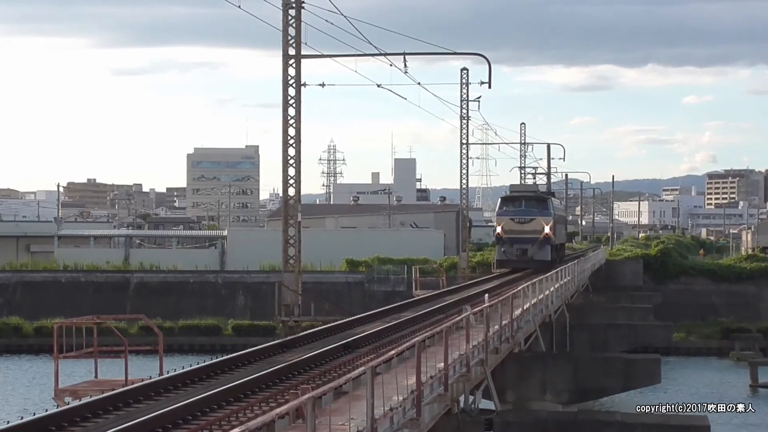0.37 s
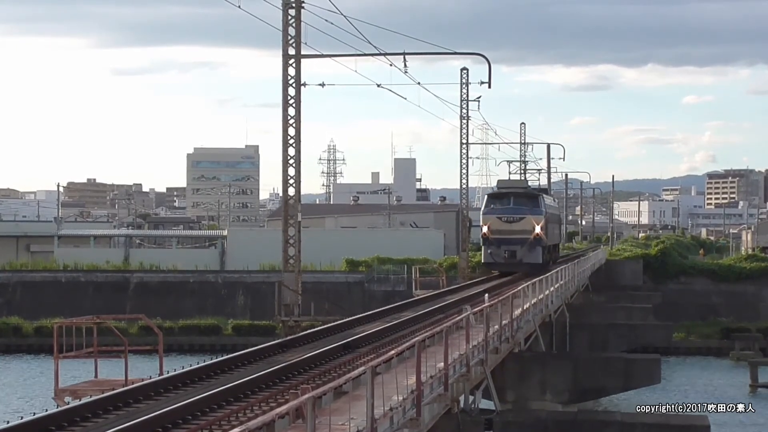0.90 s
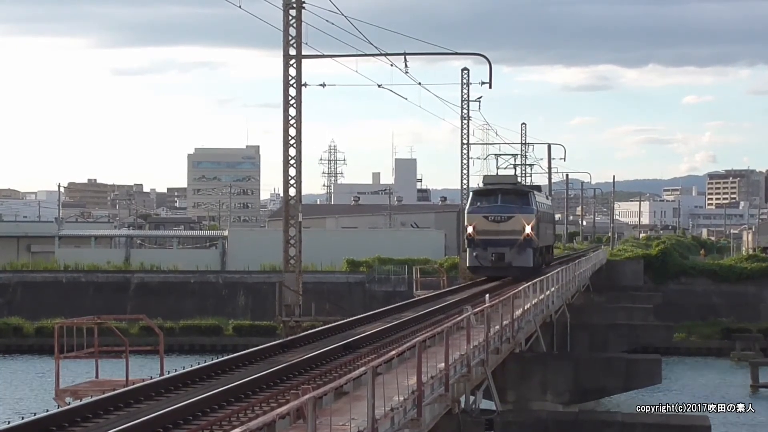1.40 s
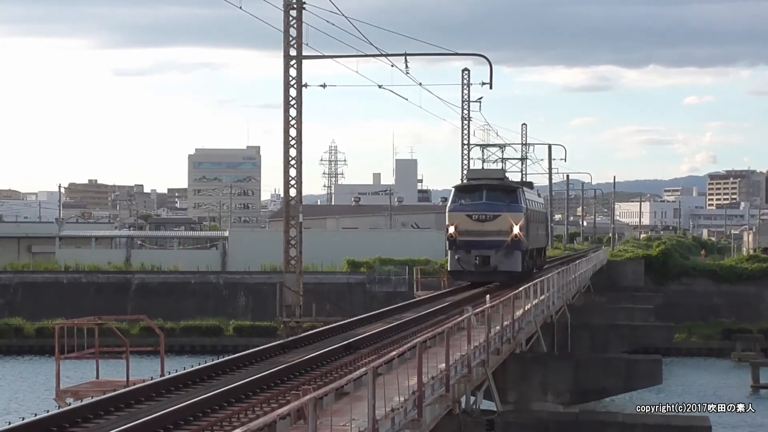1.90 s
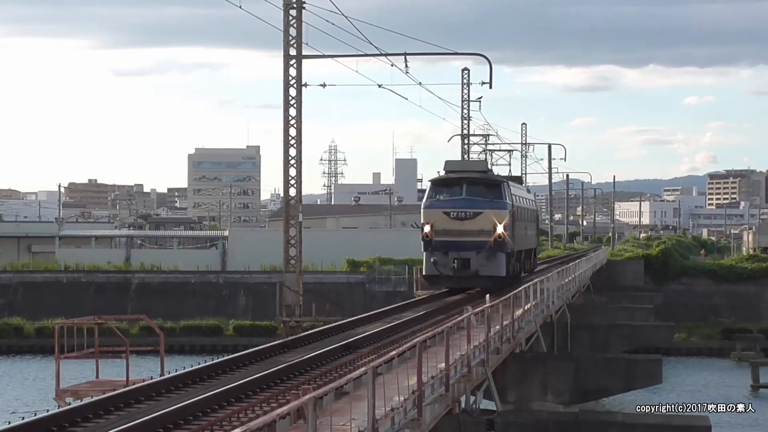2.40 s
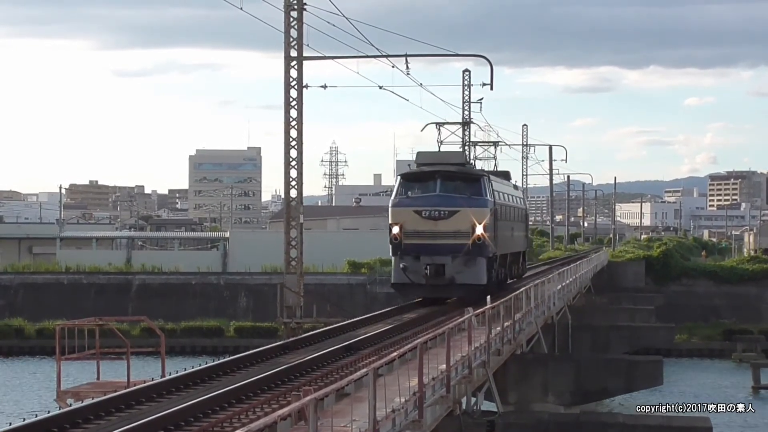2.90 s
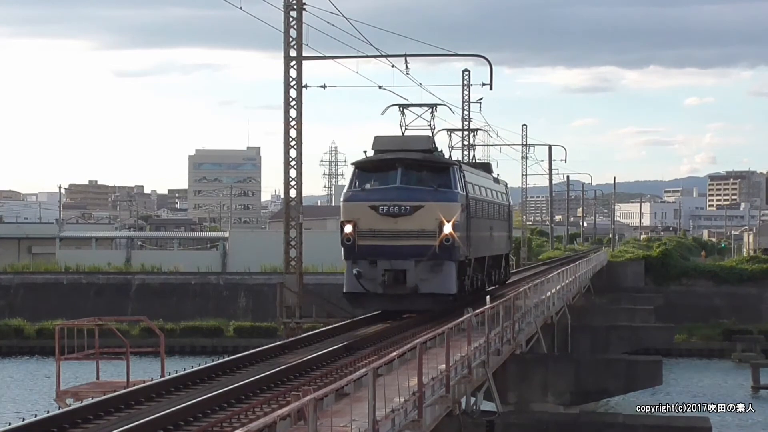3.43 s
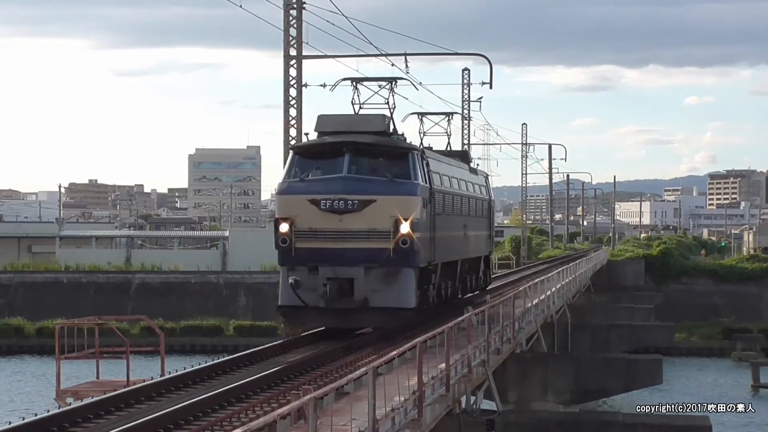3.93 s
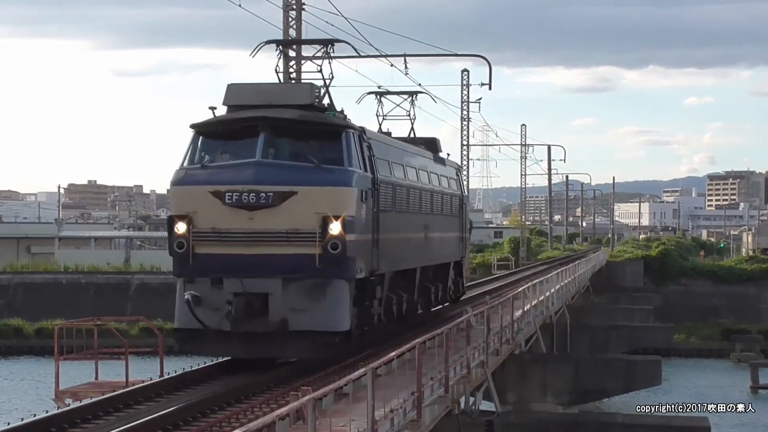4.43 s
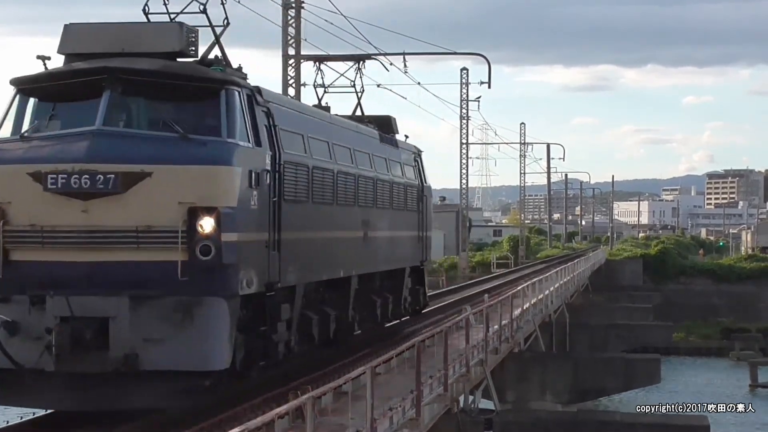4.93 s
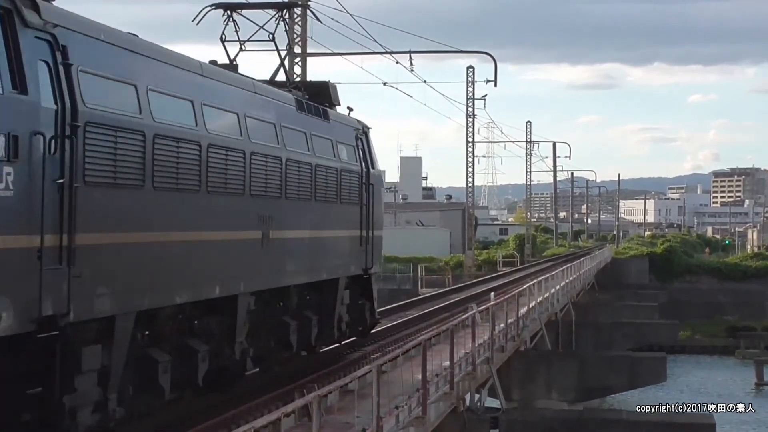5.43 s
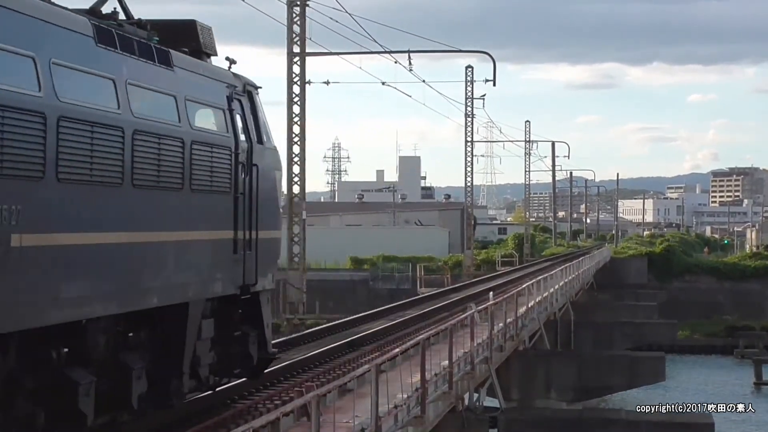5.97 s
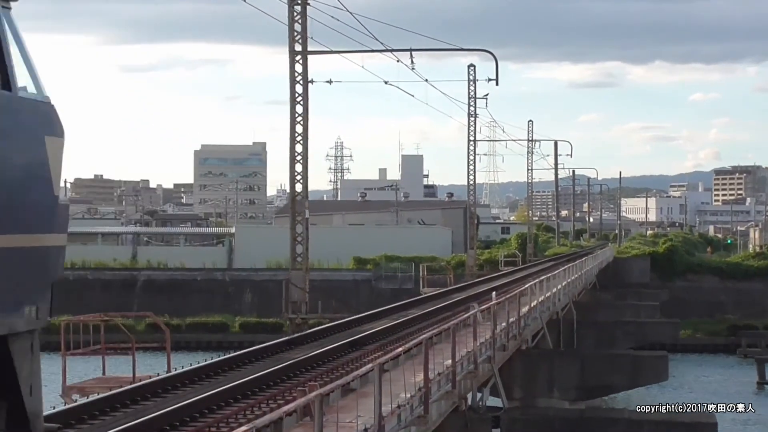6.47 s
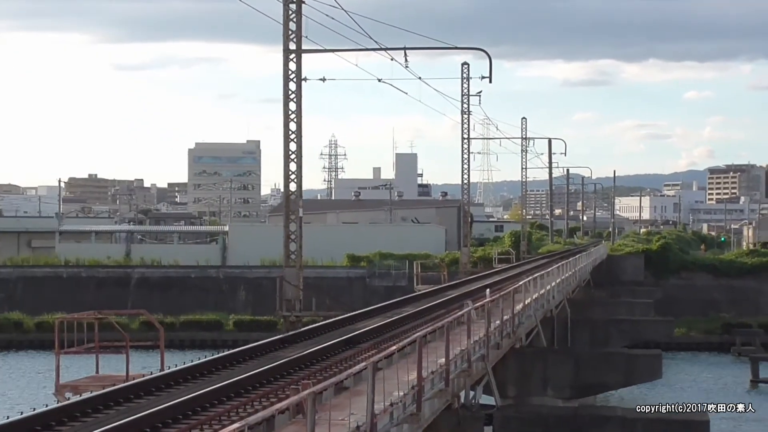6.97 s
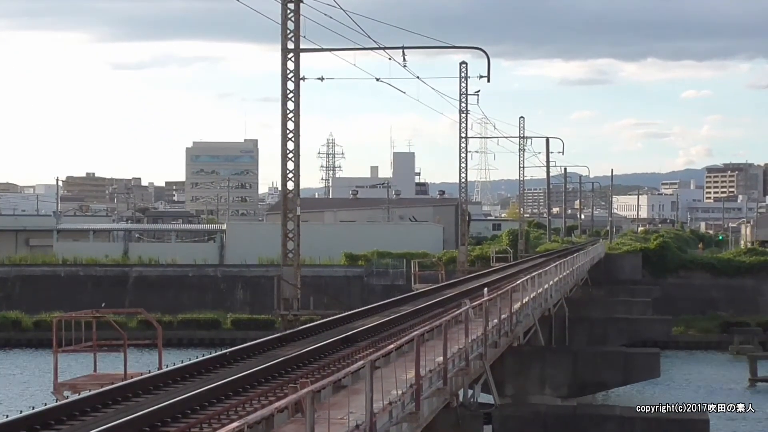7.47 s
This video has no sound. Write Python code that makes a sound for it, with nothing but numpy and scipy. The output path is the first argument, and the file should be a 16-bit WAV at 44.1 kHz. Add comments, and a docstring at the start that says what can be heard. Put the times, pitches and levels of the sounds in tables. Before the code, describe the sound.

An electric locomotive roars over a steel bridge, wheels knocking hard at rail joints, air hissing and a camera snapping as it passes and leaves left.

```python
"""A booming deck and roaring girders sound throughout, girders loudest near 6 s, with knocks at the rail
joints and buffeting wind: an electric locomotive crosses a steel bridge and leaves to the left.
Rolling, air and rattle are shaped noise bands; knocks are struck modes with broad cracks at the far joints.
Passing hums and gear whine are blurred tones, wind is low noise, a still camera's burst is pairs of
bright snaps, and a leak whistles as narrow, high noise."""
import sys
import numpy as np
from scipy import signal
from scipy.io import wavfile

SR = 44100
rng = np.random.default_rng(int(sys.argv[2]) if len(sys.argv) > 2 else 0)


def volts_from_decibels(level):
    """Turn decibel levels (scalar or array-like) into linear amplitude factors."""
    exponent = np.asarray(level, float) / 20
    return 10 ** exponent


def output_pcm(signal):
    """Save a mono or channel-first signal as 16-bit PCM at the path in sys.argv[1].

    Samples are clipped to [-1, 1] before scaling.
    """
    pcm = np.clip(np.atleast_2d(signal).T, -1, 1) * 32767
    wavfile.write(sys.argv[1], SR, np.round(pcm).astype(np.int16))


N = 335160  # length in samples
STEP = 32  # samples between control points of the noise bands
TREBLE_HZ = 5500  # from here up the treble has its own share from the side
FLUTTER_HZ, BURST_FLUTTER_DB = 9.0, 1.5  # unsteadiness of escaping air

# rolling sound: t/s, deck boom level/dB, girder roar level/dB, rail roll level/dB, wheel hiss level/dB
ROLLING_LEVELS = [(0, -22.5, -24.5, -33, -47), (.6, -20, -21.5, -36.5, -53), (1.2, -22, -22, -33.5, -48.5),
                  (1.7, -18, -17.5, -30, -46), (2.1, -22, -19, -31, -45.5), (2.5, -17.5, -15.5, -30.5, -46),
                  (3.0, -20.5, -15.5, -28.5, -45), (3.4, -20.5, -15, -27, -43),
                  (3.7, -23, -16.5, -29.5, -44.5), (4.2, -26, -13.5, -30, -44),
                  (4.6, -20.5, -13, -27, -41.5), (5.0, -22, -14.5, -29, -40), (5.4, -28, -14, -27.5, -42),
                  (5.9, -31.5, -12, -24.5, -40), (6.3, -25.5, -12, -26, -37.5),
                  (6.9, -26.5, -16, -29.5, -42), (7.25, -26.5, -18, -33.5, -43),
                  (7.6, -35, -29, -36.5, -51)]
# spectral shapes of the four rolling parts: f/Hz, relative level per Hz/dB
DECK_SPECTRUM = [(24, -48), (40, -66), (67, -11.5), (118, -2), (221, 1.5), (240, 4), (260, -0.5),
                 (340, -25), (570, -120)]
GIRDER_SPECTRUM = [(120, -45.5), (200, -13), (258, -6), (302, -3.5), (399, -2.5), (613, -10), (744, -21.5),
                   (850, -23), (1100, -56), (1870, -120)]
RAIL_SPECTRUM = [(410, -51), (700, 2), (831, 3), (909, -12.5), (1040, -3), (1400, -6.5), (1850, -22),
                 (2120, -14.5), (2480, -25.5), (3200, -47), (4160, -70), (7040, -120)]
WHEEL_SPECTRUM = [(1650, -5.5), (2800, -3), (3030, -3), (3960, -3.5), (4500, -11), (4790, -5.5),
                  (5530, -11), (7500, -9.5), (9750, -15.5), (16500, -120)]
# where the engine is: t/s, left over right level/dB, share from the side below the treble/0-1
BEARING = [(0.0, -0.5, 0.02), (0.61, -1, 0), (5.16, 0.5, 0.09), (6.31, 3, 0.46), (7.15, 6, 0.9),
           (7.6, 6, 1)]
# share of the treble heard from the side, moving with the hiss bursts: t/s, share/0-1
TREBLE_SIDE_SHARE = [(0, 0.24), (2.1, 0.27), (2.3, .03), (2.9, 0.2), (3.3, 0.4), (4.75, 0.5), (4.95, 0.73),
                     (5.5, 0.75), (6.2, 0.87), (7.6, 0.94)]
# how strongly the steel and air noise is panned: f/Hz, share of the left-right level/ratio
PAN_SHARE = [(60, 0.71), (400, 0.91), (1300, 1.4), (4400, 0.59), (8000, 0.27), (15000, -0.71)]
# fixed tone difference between the microphones: f/Hz, left over right level/dB
MICROPHONE_TILT = [(60, -4), (180, -1.0), (550, 0.5), (1650, -1), (4970, -0.5), (15000, -1)]
# likeness of the two channels, sound from ahead and from the side: f/Hz, correlation/-1 to 1
LIKENESS_AHEAD = [(60, 0.88), (200, 1), (640, 1), (1400, 0.98), (3100, 0.87), (5500, 0.52), (9000, 0.84),
                  (15000, 0.37)]
LIKENESS_BESIDE = [(60, .5), (130, 0.92), (290, 0.93), (640, 0.79), (1400, 0.31), (3100, 0.19),
                   (5500, 0.012), (7000, 0.15), (9000, -0.43), (11000, -0.7), (12500, 0.034), (15000, -.2)]
# continuous hiss from the engine, before flutter: t/s, level/dB
AIR_LEVEL = [(0, -55), (.3, -64), (.6, -71), (1.2, -66), (2.0, -54), (3.0, -52.5), (3.4, -51.5), (4.2, -48),
             (4.8, -47), (5.7, -44), (6.3, -38), (7.1, -42), (7.6, -47.5)]
# bursts of air: start t/s, swell/s, length/s, peak level/dB, sag/dB per s,
# first centre f/Hz, later centre f/Hz, breadth/octaves, upper hump over lower level/dB
AIR_BURSTS = [(0.788, 0.035, 0.068, -55, 40, 8500, 8000, 0.17, 0),
              (2.209, 0.023, 0.18, -37, 81, 6640, 7700, 0.13, -6),
              (2.567, 0.1, 0.21, -42.5, 10, 8000, 8700, .17, -3),
              (4.849, 0.023, 0.083, -39.5, 20, 8600, 8600, 0.14, 1.5),
              (4.935, 0.069, 0.66, -31.5, 23.5, 9200, 8760, 0.18, 2),
              (5.662, .012, 0.026, -41, 50, 8000, 8000, .15, -10)]
# wind: t/s, level shared by both microphones/dB, level of each one's own/dB
BREEZE_LEVELS = [(0, -34, -26.5), (.8, -28, -58), (1.5, -39, -37), (2.2, -34, -35.5), (3.7, -49, -24),
                 (4.4, -64, -34), (5.4, -70, -58), (6.8, -43, -50), (7.6, -50, -31.5)]
# passing hums and rings: f/Hz, width/Hz, level/dB, loudest at t/s, lasting/s, glide/Hz per s
HUMS = [(152, 38, -24, 0.84, 0.34, 0), (215.5, 34, -27.5, .4, .3, -60), (284, 28, -26, 0.16, 0.37, -0.5),
        (92.4, 14, -35, 4.94, 0.72, 0), (170, 28.5, -25, 4, .4, 0), (168.8, 21, -28.5, 6.25, 0.87, 0),
        (233.8, 11, -22, 1.45, 0.32, 15), (212.5, 15, -22.5, 1.6, .25, 5), (282.2, 17, -21, 2.45, 0.3, -25),
        (251, 22, -20, 2.92, .2, 0), (241, 24, -25, 3.45, .2, 20), (303.6, 15, -20.5, 4.3, 0.35, 5),
        (311.4, 12, -25, 4.8, .2, 20), (405.6, 19.4, -19, 4.4, 0.447, 15),
        (382.4, 33, -22.5, 5.95, .25, 30), (300, 25, -27.5, 7.5, 0.32, 0.5), (439.7, 36, -25, 2.2, 0.8, 15),
        (474.5, 48, -23.5, 6.1, 0.89, 10), (606.3, 38, -27.5, 4.2, 1.97, 0), (888, 29, -39.5, 4.1, 1.54, 0),
        (1307, 245, -33.5, 4.95, 1.33, 0), (2124, 190, -47.5, 3.9, 1.6, 0), (2266, 80, -43, 6, 0.46, 0),
        (3250, 300, -52, 5.05, 0.11, 0), (3420, 200, -50, 6.0, 0.35, 199.5), (3520, 90, -57, 6.7, .5, 0)]
# gear whine: t/s, f/Hz, level/dB
GEAR_WHINE = [(0, 4320, -62), (1.1, 4310, -63), (2.2, 4370, -57), (3.3, 4460, -57), (4.4, 4530, -51.5),
              (5.4, 4520, -56), (5.7, 4660, -49), (6.35, 4680, -52), (6.7, 4630, -56), (7.6, 4550, -59)]
# axles over rail joints: t/s, knock level/dB, bright ring level/dB, rattle level/dB,
# thump level/dB, boom level/dB
CROSSINGS = [(.002, -31, -32, -48, -14, -20), (.1, -27, -24, -44, -22, -24),
             (0.301, -33, -29, -47, -14, -19), (.49, -33, -30, -54, -16, -9),
             (.66, -40, -32, -52, -15.5, -16), (.842, -23, -17, -34, -17, -18),
             (1.078, -22, -21, -54, -11, -5), (1.285, -27, -24, -42, -15, -28),
             (1.497, -18, -21, -36.5, -25, -24), (1.69, -20.5, -18, -47, -14, -20),
             (1.924, -23, -24, -47, -14.5, -14), (2.69, -16, -26, -30.5, -8, -13),
             (2.918, -22, -22, -37, -9, -18), (3.096, -16.5, -24, -37, -8.5, -16),
             (3.303, -21.5, -21, -34, -10.5, -14), (3.488, -24, -24, -47, -9, -22),
             (3.7, -23, -24, -38, -14, -15), (4.434, -8, -11, -29, -6.5, -15),
             (4.666, -18, -17, -34, -12.5, -13), (4.843, -23, -10.5, -33, -12, -10),
             (5.049, -19, -28, -35, -10, -23), (5.235, -26, -25, -30, -13, -16.5),
             (5.424, -19.5, -17, -37, -16, -22), (6.188, -12.5, -10, -20, -10, -27),
             (6.386, -14, -11, -20, -14, -26), (6.563, -13.5, -14, -21.5, -11, -28),
             (6.759, -15.5, -15, -21, -9, -26), (6.936, -18.5, -21, -21, -13.5, -26),
             (7.131, -20.5, -17, -21.5, -11, -24)]
# knocks out on the bridge arrive smeared through the steel, the joint beside is sharp: t/s, smear/s
SMEAR = [(0, .045), (4, .045), (4.5, .045), (4.8, .022), (5, .045), (5.5, .045), (6, 0), (7.6, 0)]
# modes of the struck steel: f/Hz, relative level/dB, 60 dB decay/s
KNOCK_MODES = [(116.7, -6, 0.21), (163, -8, .18), (219, -5, 0.22), (341.7, 0.5, 0.12), (477.4, 2.5, 0.062),
               (617, -0.5, 0.047), (898, -3, 0.095), (982, -3.5, 0.1), (1078, -4, 0.11), (1254, -10, 0.06),
               (1407, -9, 0.074), (1724, -16, 0.06), (1900, -23, .04), (2260, -17, 0.052),
               (2830, -18, 0.03), (3195, -21.5, .03), (3470, -22, 0.055), (3980, -25.5, 0.028),
               (4730, -23, 0.03)]
# broad thud and cracks of far knocks: low f/Hz, high f/Hz, level over boom, knock or ring/dB, added length/s
CRACKS = [(90, 270, 10, .008), (750, 1600, 8, .004), (1900, 4800, 1.97, .004)]
# loose steel shaking: f/Hz, relative level per Hz/dB
RATTLE_SPECTRUM = [(410, -47), (700, 0.5), (1120, -5.5), (1760, -18), (1920, -14), (2460, -23), (3360, -21),
                   (6170, -28), (7890, -21.5), (13600, -35), (15500, -60)]
# how long it shakes: f/Hz, 60 dB decay/s
RATTLE_DECAY = [(700, 0.36), (3000, 0.44), (12000, 0.67)]
# thin whistle in the air leak: start t/s, end t/s, level/dB
WHISTLE = (5.46, 5.62, -38)


def rms_one(x):
    """Scales a signal to an rms of 1."""
    return x / np.sqrt(np.mean(x ** 2) + 1e-20)


def in_time(rows, step=1):
    """Draws straight lines through the columns of a table that starts with time."""
    s, *columns = np.transpose(rows)
    t = np.arange(0, N, step) / SR
    return [np.interp(t, s, column) for column in columns]


def at_hz(points, hz):
    """Reads a curve over pitch on a logarithmic frequency scale."""
    curve_hz, value = np.transpose(points)
    return np.interp(np.log(hz), np.log(curve_hz), value)


def drift(rate_hz, step=1):
    """Slow chance of spread 1: noise at every 40th sample through a double one-pole low-pass."""
    r = np.exp(-80 * np.pi * rate_hz / SR)
    noise = rng.standard_normal(N // 40 + 2002)
    slow = signal.lfilter([1], [1, -2 * r, r * r], noise)[2000:]  # skip the settling
    return np.interp(np.arange(0, N, step) / 40, np.arange(len(slow)), rms_one(slow))


def band(x, low_hz, high_hz, order=2):
    """Passes only the range between two pitches."""
    edges = [low_hz, min(high_hz, .45 * SR)]
    return signal.sosfilt(signal.butter(order, edges, "band", fs=SR, output="sos"), x)


def impulses(times, sizes):
    """Single-sample clicks over a tiny floor."""
    out = np.full(N, 1e-18)
    out[np.round(np.array(times) * SR).astype(int)] = sizes
    return out


def blows(sizes, rise, order):
    """One hump per crossing; its size fixes the sum of samples (order 1) or root sum of squares (order 2)."""
    out = np.full(N, 1e-18)
    for (s, *_), size in zip(CROSSINGS, sizes):
        smear = np.interp(s, *np.transpose(SMEAR))
        hump = np.hanning(3 + int((smear + rise) * SR))
        out[int(s * SR):][:len(hump)] += size * hump / np.linalg.norm(hump, order)
    return out


def panned(x, pan_db):
    """Splits a left-right level difference evenly over both channels."""
    return x * volts_from_decibels(np.array([[.5], [-.5]]) * pan_db)


def density(spectrum, hz):
    """Power per Hz of a spectrum whose whole power is 1."""
    grid = np.geomspace(spectrum[0][0], spectrum[-1][0], num=200)
    whole = np.sum(volts_from_decibels(2 * at_hz(spectrum, grid)) * np.gradient(grid))
    return volts_from_decibels(2 * at_hz(spectrum, hz)) / whole


def jet(level_db, centre, octaves):
    """A jet of air: a bell-shaped hump of hiss over pitch."""
    power = volts_from_decibels(2 * level_db) / (centre * octaves * np.sqrt(2 * np.pi) * np.log(2))
    return lambda hz: power * np.exp(-.5 * (np.log2(hz / centre) / octaves) ** 2)


def blurred_tone(hz, width_hz, wander, heard=slice(None)):
    """A narrow band of noise around a pitch that moves and wanders by a share of itself."""
    wandering_hz = hz * (1 + wander * drift(2.5))
    phase = 2 * np.pi * np.cumsum(wandering_hz[heard]) / SR
    sine_level, cosine_level = drift(.75 * width_hz)[heard], drift(.75 * width_hz)[heard]
    return sine_level * np.sin(phase) + cosine_level * np.cos(phase)


def steel_noise(layers, patchy_db):
    """Quarter-octave noise bands; each layer gives its power per Hz at a pitch, every STEP samples."""
    pan_db, beside_low = in_time(BEARING, STEP)
    beside_high, = in_time(TREBLE_SIDE_SHARE, STEP)
    edges = 35 * 2 ** np.arange(0, 9, .25)
    white = rng.standard_normal((2, 2, N))  # neighbouring bands take turns with two noise pairs
    together = drift(7.7, STEP)
    out = np.zeros((2, N))
    for k, (low, high) in enumerate(zip(edges, edges[1:])):
        hz = np.sqrt(low * high)
        power = sum(layer(hz) for layer in layers)
        mid, side = band(white[k % 2], low, high, order=3) * np.sqrt(SR / 2)
        beside = np.clip(beside_low if hz < TREBLE_HZ else beside_high, 0, 1)
        alike = (1 - beside) * at_hz(LIKENESS_AHEAD, hz) + beside * at_hz(LIKENESS_BESIDE, hz)
        alike = np.clip(alike, -1, 1)
        flicker = volts_from_decibels(patchy_db * (together + drift(27, STEP)))
        band_pan_db = pan_db * at_hz(PAN_SHARE, hz) + at_hz(MICROPHONE_TILT, hz)
        gains = panned(np.sqrt(power) * flicker, band_pan_db)
        to_mid = np.repeat(gains * np.sqrt((1 + alike) / 2), STEP, axis=1)[:, :N]
        to_side = np.repeat(gains * np.sqrt((1 - alike) / 2), STEP, axis=1)[:, :N]
        out += to_mid * mid + to_side * side * [[1], [-1]]
    return out


def rolling():
    """Wheel roughness shakes deck, girders, rails and wheels, each in its own range."""
    throb_db, throb_hz = (2.2, 0.77, 1.28, 1.1), 9.3  # each part swells and sinks at random
    spectra = (DECK_SPECTRUM, GIRDER_SPECTRUM, RAIL_SPECTRUM, WHEEL_SPECTRUM)
    powers = []
    for level_db, depth_db in zip(in_time(ROLLING_LEVELS, STEP), throb_db):
        powers.append(volts_from_decibels(2 * (level_db + depth_db * drift(throb_hz, STEP))))
    return lambda hz: sum(power * density(shape, hz) for power, shape in zip(powers, spectra))


def air():
    """A fluttering continuous jet, and two-humped bursts that swell, glide in pitch, sag and shut."""
    glide_s, from_db, shut_db_per_s = 0.13, -18, 130
    upper_ratio = 1.37  # pitch of the upper hump over the lower
    steady_db = in_time(AIR_LEVEL, STEP)[0] + 1.6 * drift(FLUTTER_HZ, STEP)
    jets = [jet(steady_db, centre=8700, octaves=0.28)]
    for s, swell, length, peak_db, sag, first_hz, later_hz, octaves, upper_db in AIR_BURSTS:
        last_db = peak_db - sag * (length - swell)
        shape = [(s - .01, -150), (s, peak_db + from_db), (s + swell, peak_db),
                 (s + length, last_db), (s + length + 1, last_db - shut_db_per_s)]
        level_db, = in_time(shape, STEP)
        centre, = in_time([(s, first_hz), (s + glide_s, later_hz)], STEP)
        lower_flutter_db = BURST_FLUTTER_DB * drift(FLUTTER_HZ, STEP)
        upper_flutter_db = BURST_FLUTTER_DB * drift(FLUTTER_HZ, STEP)
        jets.append(jet(level_db + lower_flutter_db, centre, octaves))
        jets.append(jet(level_db + upper_flutter_db + upper_db, upper_ratio * centre, octaves))
    return lambda hz: sum(one(hz) for one in jets)


def breeze():
    """Lumpy low wind noise, part shared, part its own on each microphone."""
    shared_db, own_db = in_time(BREEZE_LEVELS)
    shared = rms_one(band(rng.standard_normal(N), 46, 125))
    own = rms_one(band(rng.standard_normal((2, N)), 62, 314, order=3))
    gusts = volts_from_decibels(1.4 * drift(3.2))
    return gusts * (volts_from_decibels(shared_db) * shared + volts_from_decibels(own_db) * own)


def hums():
    """Passing hums and rings: blurred tones that each swell, glide and fade at a set time."""
    t = np.arange(N) / SR
    out = np.zeros(N)
    for hz, width_hz, level_db, at, lasting, glide in HUMS:
        moving_hz = hz + glide * np.clip(t - at, -2 * lasting, 2 * lasting)
        heard = np.abs(t - at) < 3.5 * lasting
        swell = np.exp(-.5 * ((t[heard] - at) / lasting) ** 2)
        out[heard] += volts_from_decibels(level_db) * swell * blurred_tone(moving_hz, width_hz, .007, heard)
    return panned(band(out, 73, 9000), in_time(BEARING)[0])


def whine():
    """Gear teeth sing at their contact rate, blurred by six axles that never quite agree."""
    hz, level_db = in_time(GEAR_WHINE)
    tone = volts_from_decibels(level_db + 1.8 * drift(8.0)) * blurred_tone(hz, width_hz=120, wander=.006)
    return panned(tone, .5 * in_time(BEARING)[0])


def knocks():
    """The wheel drops on the next rail end and strikes every mode with a strength of its own."""
    boom_below_hz, thump_below_hz, ring_above_hz = 190, 550, 1600
    far_loss_db = 2.5  # smeared knocks excite the upper modes less
    s, knock_db, ring_db, _, thump_db, boom_db = np.transpose(CROSSINGS)
    chance = rng.standard_normal((len(s), len(KNOCK_MODES)))
    far = np.interp(s, *np.transpose(SMEAR)) > 0
    out = np.zeros(N)
    for (low_hz, high_hz, crack_db, added), blow_db in zip(CRACKS, (boom_db, knock_db, ring_db)):
        envelope = blows(volts_from_decibels(blow_db + crack_db) * far, rise=added, order=2)
        out += band(rng.standard_normal(N) * envelope, low_hz, high_hz)
    for k, (hz, level_db, t60) in enumerate(KNOCK_MODES):
        r, w = volts_from_decibels(-60 / (t60 * SR)), 2 * np.pi * hz / SR  # decay and turn per sample
        if hz < boom_below_hz:  # the girders take the low part
            blow_db = boom_db
        elif hz < thump_below_hz:
            blow_db = thump_db
        else:
            blow_db = knock_db if hz < ring_above_hz else ring_db
        loss_db = far_loss_db * far * (hz > thump_below_hz)
        sizes = volts_from_decibels(blow_db + level_db - loss_db + 1.06 * chance[:, k])
        if hz < thump_below_hz:  # heavy girders swing up smoothly, then die away
            swing = signal.lfilter([1], [1, -r], blows(sizes, rise=0.0048, order=1))
            out += swing * np.sin(w * np.arange(N) + k)
        else:
            strike = rng.choice([-1, 1], N) * blows(sizes, rise=0, order=2)
            out += signal.lfilter([0, np.sin(w)], [1, -2 * r * np.cos(w), r * r], strike)
    return panned(band(out, 101, 9000), 1.8 * in_time(BEARING)[0])


def rattle():
    """After each knock loose steel shakes on, dying band by band."""
    rattle_db = np.transpose(CROSSINGS)[3]
    kicks = STEP * blows(volts_from_decibels(2 * rattle_db), rise=0.0035, order=1)[::STEP]

    def power(hz):
        """Decaying power per Hz at one pitch."""
        keep = volts_from_decibels(-120 * STEP / (at_hz(RATTLE_DECAY, hz) * SR))  # power kept per step
        return density(RATTLE_SPECTRUM, hz) * signal.lfilter([1], [1, -keep], kicks)
    return power


def shutter():
    """Each camera frame is two snaps of bright noise, shutter and mirror."""
    start_s, frame_s, mirror_delay_s, frames = 1.8632, 0.24687, 0.0697, 7
    shutter_db, mirror_db, frame_loss_db, spread_db = -38.5, -33, 0.5, 2.2
    frame = np.arange(frames)[:, None]
    s = start_s + frame_s * frame + [0, mirror_delay_s]
    strike_db = np.array([shutter_db, mirror_db]) - frame_loss_db * frame
    strike_db = strike_db + spread_db * rng.standard_normal(s.shape)
    fall, rise = volts_from_decibels(-60 / (0.045 * SR)), volts_from_decibels(-60 / (0.012 * SR))  # 60 dB in 45 ms and 12 ms
    clicks = impulses(s.ravel(), volts_from_decibels(strike_db.ravel()))
    shape = signal.lfilter([1 - rise], np.convolve([1, -fall], [1, -rise]), clicks)
    mid, side = rms_one(band(rng.standard_normal((2, N)), 2300, 12000))
    return panned(shape * (mid + 0.61 * side * [[1], [-1]]), 1.5)


def whistle():
    """The air leak whistles: noise in a narrow, very high resonance."""
    centre_hz, width_hz = 13650, 650
    rise_db_per_s, fall_db_per_s = 354, 220
    t = np.arange(N) / SR
    start, end, level_db = WHISTLE
    before, after = np.maximum(start - t, 0), np.maximum(t - end, 0)
    level = volts_from_decibels(level_db - rise_db_per_s * before - fall_db_per_s * after)
    noise = rng.standard_normal((2, N)) * volts_from_decibels(BURST_FLUTTER_DB * drift(FLUTTER_HZ))
    return level * rms_one(band(noise, centre_hz - width_hz / 2, centre_hz + width_hz / 2))


def scene():
    """Sums the noise bands, tones, knocks, snaps and wind."""
    steel = steel_noise([rolling(), air(), rattle()], patchy_db=0.39)
    return steel + breeze() + hums() + whine() + knocks() + shutter() + whistle()


def top_cut(x):
    """Nothing passes above the cut-off."""
    return signal.sosfilt(signal.butter(12, 15620, fs=SR, output="sos"), x)


def record(dry):
    """Rounds off the loudest peaks by soft saturation."""
    mix = 1.482 * np.tanh(dry / 1.818)
    return top_cut(mix)


dry = scene()
out = record(dry)
output_pcm(out)
```